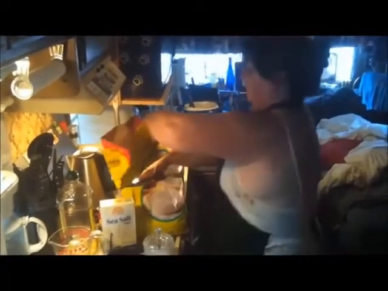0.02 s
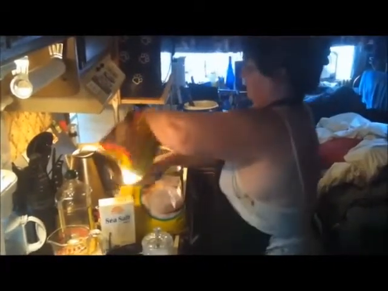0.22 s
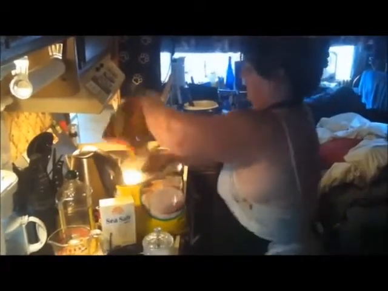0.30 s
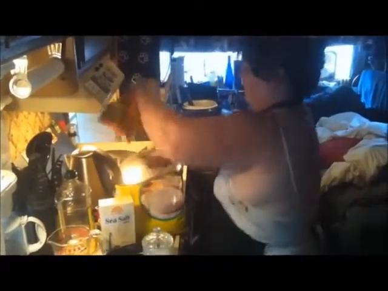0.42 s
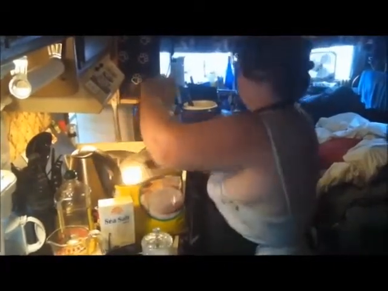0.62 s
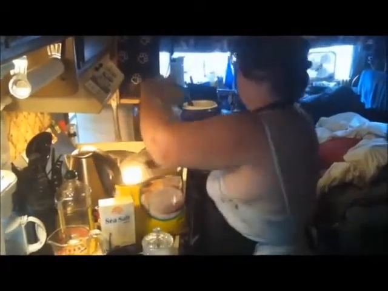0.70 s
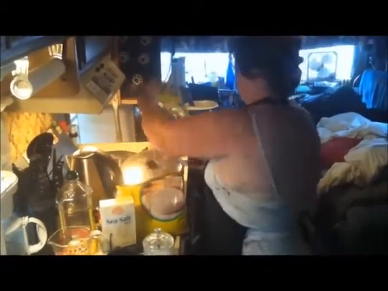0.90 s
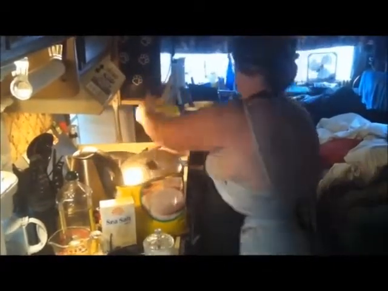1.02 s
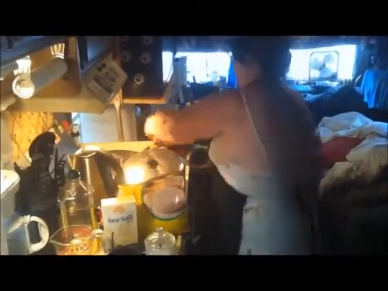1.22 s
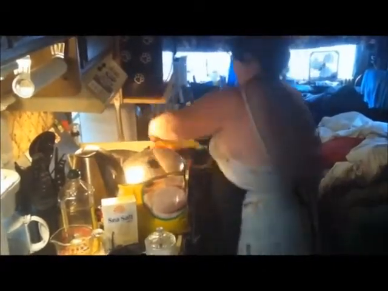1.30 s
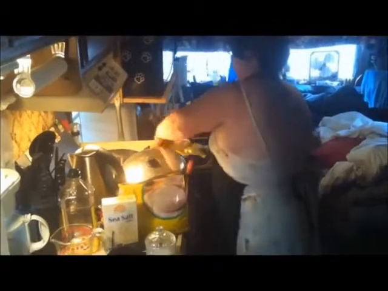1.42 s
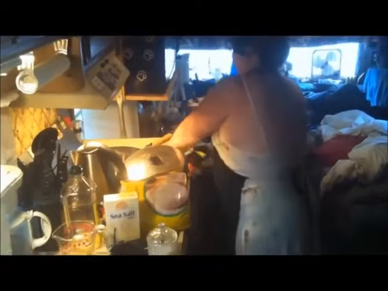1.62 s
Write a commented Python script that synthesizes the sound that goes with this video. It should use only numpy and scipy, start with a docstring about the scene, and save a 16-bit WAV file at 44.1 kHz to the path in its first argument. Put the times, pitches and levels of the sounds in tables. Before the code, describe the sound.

A cup knocks once on a metal bowl, which rings briefly, while a paper flour bag rustles and crackles. Soft bumps, light taps and a faint sliding hiss follow, then a duller clack, close by in a small kitchen.

```python
"""A cup knocks once on a metal bowl as flour is scooped from a paper bag in a small kitchen.
The knock is a cluster of contacts with one hard snap; the bowl's modes ring briefly.
The bag rustles in dense paper grains and crackles where folds give way. Soft handling bumps,
light taps and a faint sliding hiss follow, then a duller clack as something is put down."""
import sys
import numpy as np
from scipy import signal
from scipy.fft import rfft, irfft
from scipy.io import wavfile

SR = 44100
rng = np.random.default_rng(int(sys.argv[2]) if len(sys.argv) > 2 else 0)


def generate_wav(sig):
    """Save sig (samples, or channels by samples) to the path in sys.argv[1] as 16-bit PCM at SR."""
    pcm = np.round(np.clip(np.atleast_2d(sig).T, -1, 1) * 32767).astype(np.int16)
    wavfile.write(sys.argv[1], SR, pcm)


N = 72765
T = np.arange(N) / SR

# cup contacts (time [s], level [dB], treble [dB], t60 [s], ring [dB], excitation centre [Hz])
KNOCKS = [(0.2494, -35, 13, 0.059, -33, 603), (.2524, -25.5, -3, 0.22, -25.5, 555),
          (.269, -31, 3.5, 0.12, -25.5, 1030), (.278, -29.5, 4.5, 0.047, -37, 1130),
          (0.293, -36.5, 5, 0.055, -40.5, 990), (.323, -48, -16, 0.061, -41.5, 680),
          (0.382, -43.5, -13, 0.17, -43.5, 630), (.393, -50, -4, 0.12, -45.5, 850)]
# knock spectrum (frequency [Hz], gain [dB])
KNOCK_EQ = [(25, -47), (42, -37), (62, -42), (90, -30), (150, -18.5), (215, -8), (270, -20), (330, -6),
            (460, -9.5), (580, 4), (730, -4), (1000, -10), (1400, -4.5), (1900, -8), (2700, -15),
            (3300, -10), (4000, -9), (4700, -13), (6300, -12.5), (7400, -18.5), (10000, -16.5),
            (11700, -22), (13300, -13.5), (15600, -42)]
# bowl modes (frequency [Hz], gain [dB], t60 [s])
BOWL_MODES = [(338, -14, .12), (384, -16, .08), (552, -8, .08), (590, 0, .13), (627, -11, .12),
              (984, 0, .15), (1069, -13, .16), (1125, -12, .2), (1358, -15, .18), (3294, -6, .13),
              (3920, -4, .12), (3975, -4, .14), (4130, -5, .11), (5035, -10, .12)]
# rustle envelope (time [s], level [dB])
RUSTLE_ENV = [(0, -52.5), (.04, -51), (.075, -47), (.125, -52.5), (.16, -43.5), (.205, -47), (.245, -42.5),
              (.31, -44.5), (.365, -51), (.39, -45.5), (.425, -48), (.465, -59), (.51, -68), (.57, -63),
              (.6, -65), (.655, -55.5), (.72, -74)]
# rustle spectrum (frequency [Hz], gain [dB])
RUSTLE_EQ = [(35, -48), (60, -23), (188, -27), (266, -8.5), (444, -14.5), (587, -4), (690, -10),
             (1100, -4.5), (1970, -8.5), (2430, -15), (4240, -8.5), (5110, -13), (6440, -11.5), (7410, -20),
             (10500, -15), (13300, -17.5), (15600, -24)]
# folds giving way (time [s], level [dB], treble [dB], t60 [s], rise [s])
CRACKLES = [(.002, -43, -25, 0.098, 0.00071), (0.061, -45, -19, 0.14, 0.0018),
            (0.076, -36, 0, 0.11, 0.00097), (0.102, -42, -13, 0.055, 0.00087),
            (0.135, -39.5, -1.5, 0.12, 0.0018), (.155, -40.5, -5, 0.15, 0.0029),
            (0.174, -36.5, -16, 0.064, 0.00106), (0.231, -42, 2.5, 0.041, 0.0018),
            (0.375, -36.5, 4.5, 0.072, 0.01), (0.614, -42.5, 1.5, 0.059, .014),
            (0.8102, -47.5, -3, 0.16, .003)]
# crackle spectrum (frequency [Hz], gain [dB])
CRACKLE_EQ = [(40, -21), (100, -22), (250, -12), (600, -7), (850, -14), (1050, 0), (1500, -5.5), (1900, -4),
              (2600, -12.5), (3400, -10.5), (4300, -7.5), (5200, -13), (6300, -9.5), (7400, -22),
              (10500, -13), (11600, -31), (13300, -10.5), (15600, -31)]
# put-down contacts (time [s], level [dB], treble [dB], t60 [s])
CLACKS = [(1.5854, -39, 1.5, 0.11), (1.5982, -39, -2.5, 0.13)]
# clack spectrum (frequency [Hz], gain [dB])
CLACK_EQ = [(47, -43), (80, -26), (336, -8.5), (727, -3.5), (867, -11.5), (968, -0.5), (1230, 0.5),
            (1380, -4.5), (1540, -1.5), (2500, -12.5), (4150, -8.5), (4530, -22), (6180, -15), (7210, -29),
            (8410, -22.5), (12800, -26), (15600, -44)]
# hollow ring (frequency [Hz], level [dB], t60 [s])
CLACK_MODES = [(1020, -64, 0.086), (1114, -51, 0.12), (1222, -52, 0.15), (1540, -68, .12)]
# handling bumps (time [s], level [dB], pitch [Hz], upper edge [Hz], t60 [s])
BUMPS = [(.131, -44.5, 305, 436, 0.13), (.229, -43, 247, 325, .12), (0.249, -36.5, 222.5, 343, .09),
         (.276, -36, 171, 406, 0.055), (0.387, -59, 214, 604, 0.091), (0.469, -65, 170, 250, 0.23),
         (.62, -58, 178, 280, 0.14), (0.885, -55, 218, 304, 0.1), (.975, -45, 252, 704, 0.062),
         (0.988, -48.5, 240, 690, 0.11), (1.219, -57, 286, 710, .13), (1.452, -64.5, 328, 440, .1),
         (1.633, -47.5, 181, 263, 0.38)]
# handling taps (time [s], level [dB], pitch [Hz])
TAPS = [(0.061, -55, 1270), (.495, -55, 1770), (.622, -64, 1180), (0.625, -53, 1790), (.816, -53.5, 1680),
        (0.977, -52, 1070), (.989, -55.5, 1024), (1.258, -63.5, 1300)]
# slide envelope (time [s], level [dB])
SLIDE_ENV = [(1.0, -73), (1.06, -64.5), (1.17, -72.5), (1.32, -68), (1.4, -61), (1.465, -55.5),
             (1.5, -61.5), (1.55, -59), (1.58, -59.5), (1.65, -55.5)]
# slide spectrum (frequency [Hz], gain [dB])
SLIDE_EQ = [(88, -54), (150, -16), (360, -0.5), (412, -23), (632, -12), (710, -17), (813, -14.5),
            (1990, -7), (2610, -17), (3930, -10.5), (7450, -20.5), (12600, -16.5), (15600, -22)]
# wall and worktop echoes (delay [ms], gain [linear])
REFLECTIONS = [(2.3, 0.053), (5.1, 0.068), (8.2, 0.12), (12.7, 0.079), (17.3, 0.047)]
# room hiss spectrum (frequency [Hz], gain [dB])
HISS_EQ = [(25, -4), (41, -31), (61, -32), (110, -14), (220, -4.5), (434, -10), (570, -8), (900, -8.5),
           (1080, -11.5), (1310, -12.5), (1450, -8.5), (1960, -13), (2570, -16.5), (4500, -13),
           (7000, -18), (15600, -18.5)]


def cup_on_bowl(spread_oct=0.43, min_coupling=0.14):
    """Contact cluster; where each lands sets which modes of the damped bowl ring."""
    out = colour(sum(contact(*row[:4], direct=0.37) for row in KNOCKS), KNOCK_EQ)
    times_s, _, _, _, ring_db, centre_hz = np.transpose(KNOCKS)
    for hz, db, t60_s in BOWL_MODES:
        offset_oct = np.log2(hz / centre_hz)
        coupling = np.maximum(min_coupling, np.exp(-(offset_oct / spread_oct) ** 2))
        strikes = np.zeros(N)
        strikes[(times_s * SR).astype(int)] = coupling * from_db(ring_db + db)
        radius = np.exp(-np.log(1000) / (t60_s * SR))
        step_rad = 2 * np.pi * hz / SR
        feedback = [1, -2 * radius * np.cos(step_rad), radius ** 2]
        out += signal.lfilter([0, np.sin(step_rad)], feedback, strikes + 1e-18)
    return out + snap()


def snap(hz=3943, width_hz=1308):
    """Main blow: one hard contact through a broad resonance."""
    blow = contact(start_s=0.2526, db=-20.5, treble_db=0, t60_s=0.0445, direct=0.22)
    return resonate(blow, hz, width_hz) * np.sqrt(SR / np.pi / width_hz)


def bag(crinkle_db=1, crinkle_hz=127, flex_db=-22.5, flex_hz=164, flex_width_hz=130):
    """Uneven paper grains over flexing walls; crackles where folds give way."""
    crinkle = from_db(crinkle_db * unit_rms(lowpass(noise(), crinkle_hz)))
    paper = unit_rms(grains(per_s=6000, spread_db=1.5) * crinkle)
    rustle = colour(paper * envelope(RUSTLE_ENV), RUSTLE_EQ)
    walls = resonate(resonate(noise(), flex_hz, flex_width_hz), flex_hz, flex_width_hz)
    flex = from_db(flex_db) * unit_rms(walls) * envelope(RUSTLE_ENV)
    crackles = colour(sum(contact(*row, direct=0.093) for row in CRACKLES), CRACKLE_EQ)
    return rustle + flex + crackles


def put_down():
    """Dull double contact; each rings short, hollow modes."""
    clacks = colour(sum(contact(*row, direct=0.14) for row in CLACKS), CLACK_EQ)
    hollow = sum(from_db(db) * ring(start_s, hz, t60_s)
                 for start_s, *_ in CLACKS for hz, db, t60_s in CLACK_MODES)
    return clacks + hollow


def bumps(ring_db=-2, highpass_hz=140):
    """Soft contacts: dull noise plus one short, low mode."""
    out = np.zeros(N)
    for start_s, db, hz, edge_hz, t60_s in BUMPS:
        push = noise() * decay(start_s, t60_s)
        thud = lowpass(push, edge_hz, order=5) * np.sqrt(SR / 4 / edge_hz)
        mode = lowpass(ring(start_s, hz, t60_s), 2 * edge_hz, order=4)
        out += from_db(db) * (thud + from_db(ring_db) * mode)
    return signal.sosfilt(signal.butter(3, highpass_hz, "high", fs=SR, output="sos"), out)


def taps(t60_s=0.093, width_hz=147):
    """Light pitched contacts: decaying narrow-band noise."""
    out = np.zeros(N)
    for start_s, db, hz in TAPS:
        band = resonate(resonate(noise(), hz, width_hz), hz, 2 * width_hz)
        out += from_db(db) * unit_rms(band) * decay(start_s, t60_s)
    return out


def slide():
    """Powder and paper sliding: grains dense enough to hiss."""
    return colour(grains(per_s=19000, spread_db=2.5) * envelope(SLIDE_ENV), SLIDE_EQ)


def kitchen(x, t60_s=0.38, tail_db=-21.5, wall_hz=6460):
    """Close reflections plus a short, slightly dull tail."""
    early = sum(gain * np.pad(x, (int(ms * SR / 1000), 0))[:N] for ms, gain in REFLECTIONS)
    tail = lowpass(noise(), wall_hz, order=1) * decay(0.0068, t60_s)
    tail /= np.sqrt(np.sum(tail ** 2))
    return early + from_db(tail_db) * signal.fftconvolve(x, tail)[:N]


def room_hiss(db=-64.5):
    """Steady background noise."""
    return from_db(db) * colour(noise(), HISS_EQ)


def contact(start_s, db, treble_db, t60_s, rise_s=0, direct=0, shelf_hz=2120):
    """Click plus dense scatter, treble-shelved; direct is the click-to-scatter ratio."""
    attack = np.clip((T - start_s) / max(rise_s, 1 / SR), 0, 1)
    hit = grains(per_s=16000, spread_db=3) * decay(start_s, t60_s) * attack
    hit[int((start_s + rise_s) * SR)] += direct * np.sqrt(np.sum(hit ** 2))
    low = lowpass(hit, shelf_hz, order=1)
    return from_db(db) * (low + from_db(treble_db) * (hit - low))


def grains(per_s, spread_db):
    """Random clicks of uneven size, unit power."""
    sizes = from_db(spread_db * np.minimum(rng.exponential(1, N), 4))
    signs = rng.choice([-1, 1], N)
    return unit_rms(sizes * signs * (rng.random(N) < per_s / SR))


def ring(start_s, hz, t60_s):
    """One struck mode."""
    return decay(start_s, t60_s) * np.sin(2 * np.pi * hz * (T - start_s))


def decay(start_s, t60_s):
    """Step onset, exponential fall."""
    return (T >= start_s) * from_db(-60 * np.maximum(T - start_s, 0) / t60_s)


def envelope(rows):
    """Gain along a level curve; ends held 30 ms, then faded over 30 ms."""
    times_s, db = np.transpose(rows)
    start_s, end_s = times_s[0], times_s[-1]
    gate = np.interp(T, [start_s - .06, start_s - .03, end_s + .03, end_s + .06], [0, 1, 1, 0])
    return from_db(np.interp(T, times_s, db)) * gate


def colour(x, eq):
    """Minimum-phase EQ; white noise keeps its power."""
    size = 2 ** 17
    hz, db = np.transpose(eq)
    bins_hz = np.arange(size // 2 + 1) * SR / size
    gain = unit_rms(from_db(np.interp(np.log(bins_hz + 1), np.log(hz), db)))
    cepstrum = irfft(np.log(gain))
    cepstrum[1:size // 2] *= 2
    cepstrum[size // 2 + 1:] = 0
    return irfft(rfft(x, size) * np.exp(rfft(cepstrum)))[:N]


def resonate(x, hz, width_hz):
    """Two-pole band-pass, unit peak gain."""
    radius = np.exp(-np.pi * width_hz / SR)
    feedback = [1, -2 * radius * np.cos(2 * np.pi * hz / SR), radius ** 2]
    return signal.lfilter(np.array([1, 0, -1]) * (1 - radius ** 2) / 2, feedback, x)


def lowpass(x, hz, order=2):
    return signal.sosfilt(signal.butter(order, hz, fs=SR, output="sos"), x)


def noise():
    return rng.standard_normal(N)


def unit_rms(x):
    return x / np.sqrt(np.mean(x ** 2) + 1e-20)


def from_db(db):
    return 10 ** (np.asarray(db) / 20)


def scene():
    """Sources, room response and hiss; mono."""
    near = slide() + bag() + cup_on_bowl() + put_down() + bumps() + taps()
    return (near + kitchen(near) + room_hiss())[None]


def record(dry):
    """Steep elliptic low-pass."""
    cutoff_hz = 15600
    return signal.sosfilt(signal.ellip(12, .2, 80, cutoff_hz, fs=SR, output="sos"), dry)


dry = scene()
out = record(dry)
generate_wav(out)
```